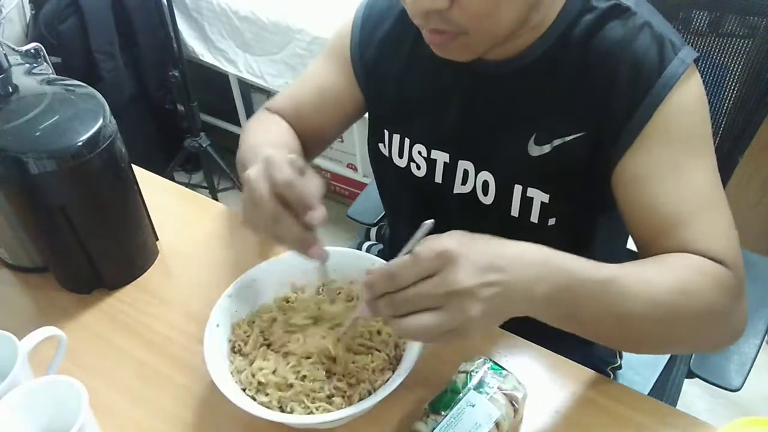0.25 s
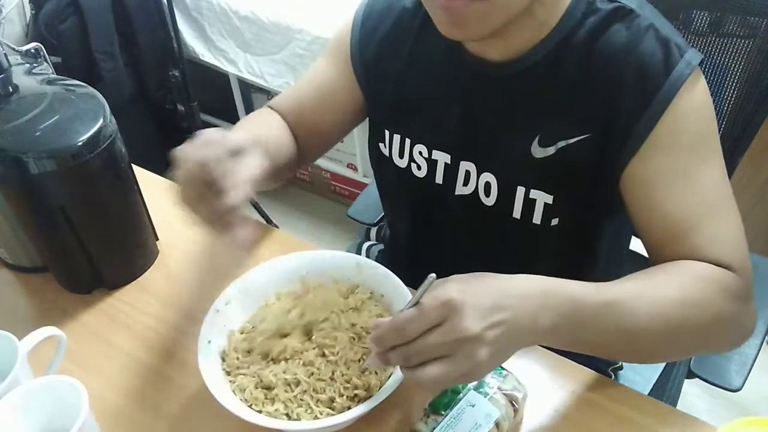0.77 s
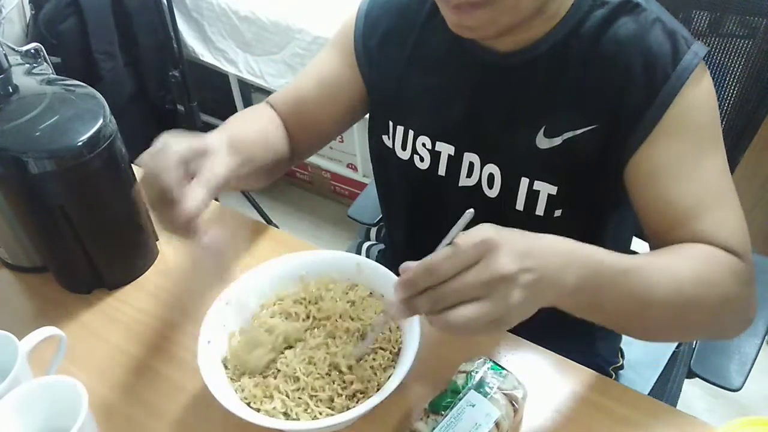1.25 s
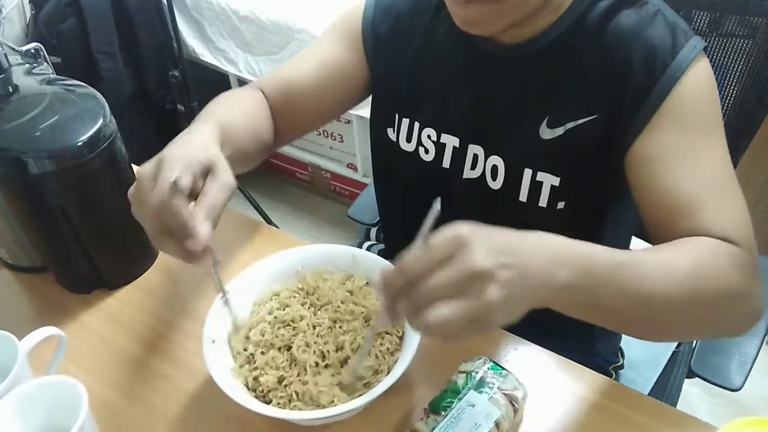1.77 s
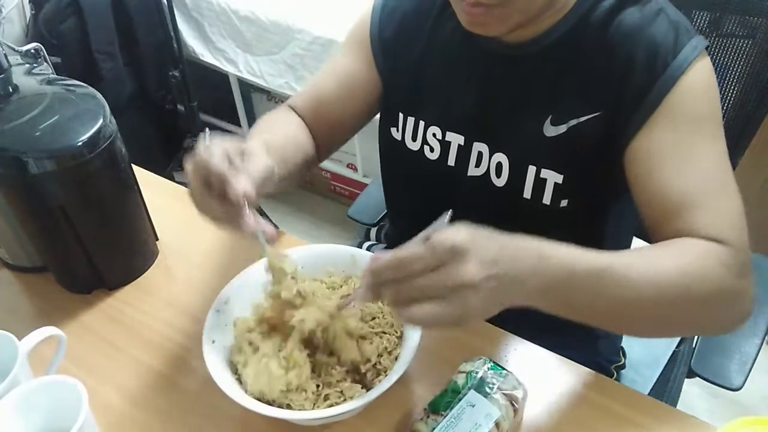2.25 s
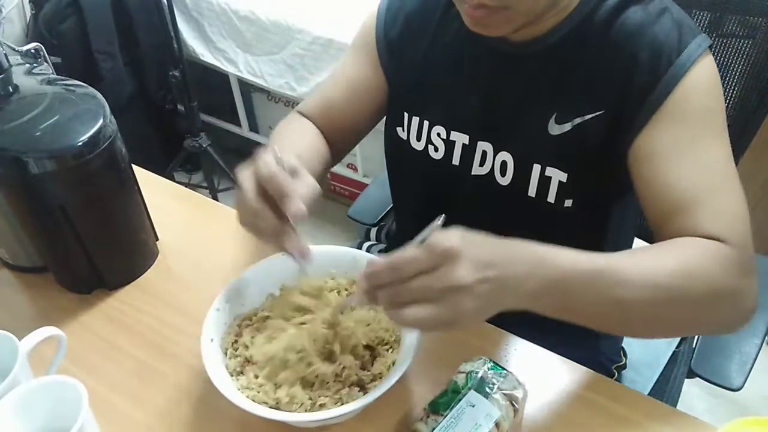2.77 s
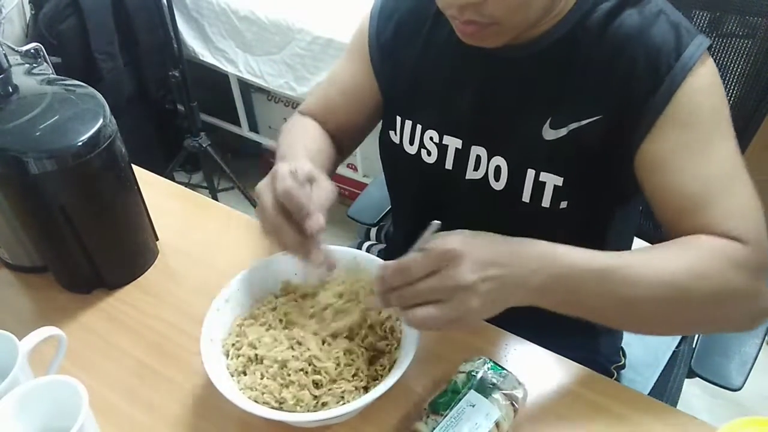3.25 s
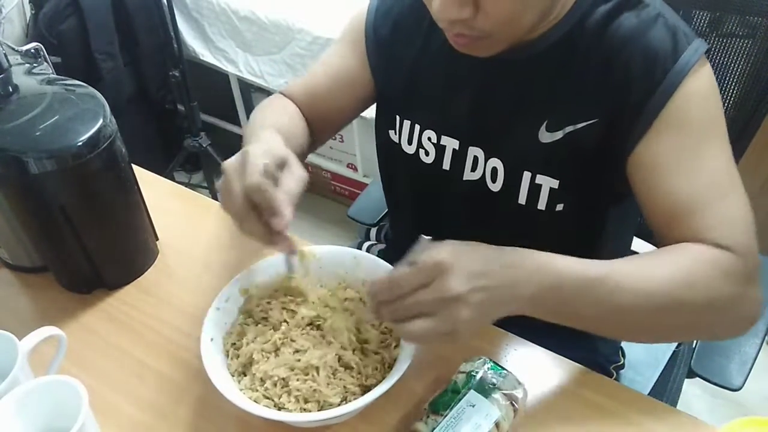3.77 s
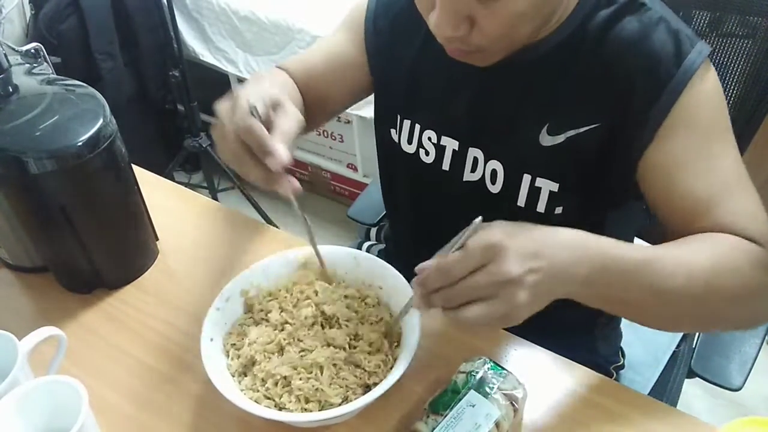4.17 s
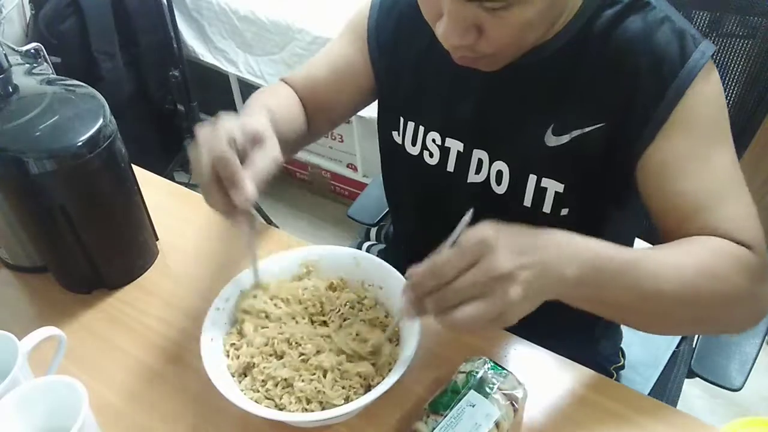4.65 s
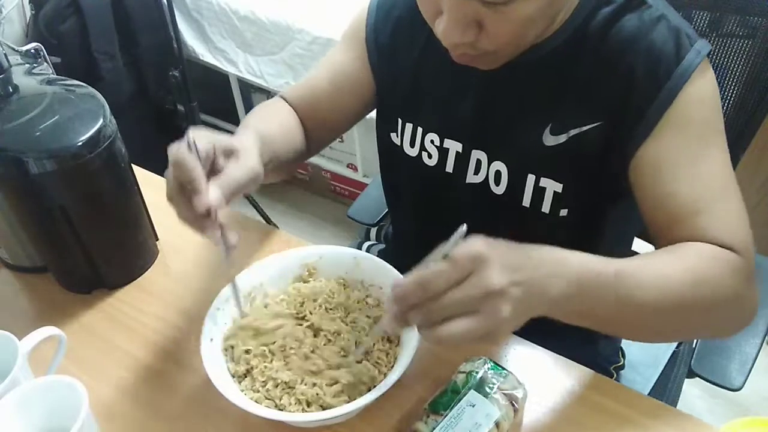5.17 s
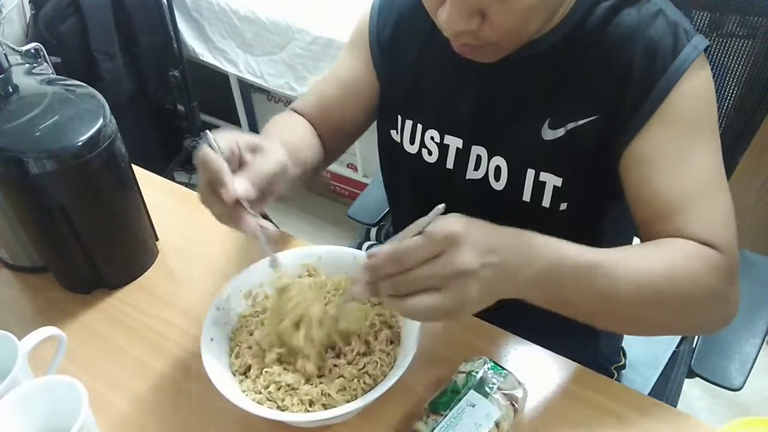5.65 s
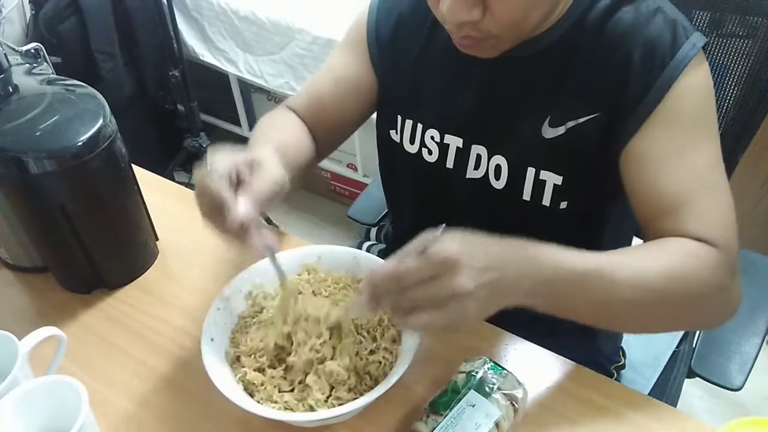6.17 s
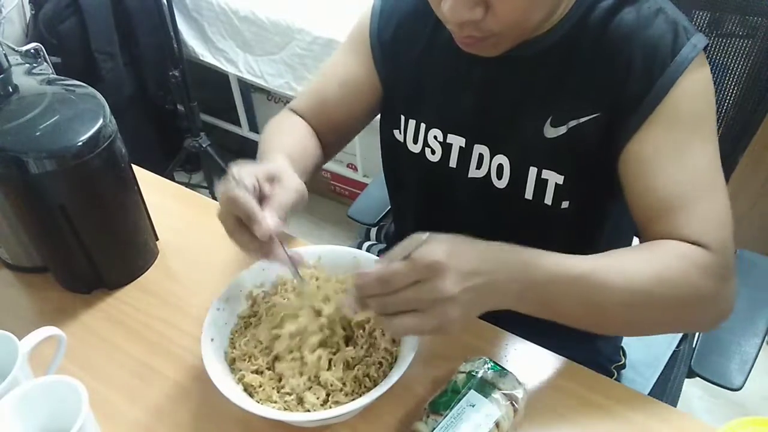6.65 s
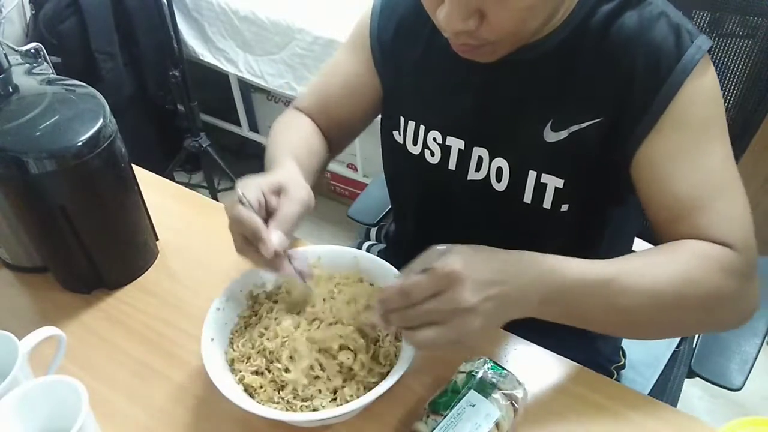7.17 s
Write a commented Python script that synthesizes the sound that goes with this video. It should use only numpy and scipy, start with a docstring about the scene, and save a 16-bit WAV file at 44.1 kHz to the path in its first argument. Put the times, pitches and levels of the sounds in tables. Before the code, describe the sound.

In a small, dry room, metal chopsticks mix noodles in a full ceramic bowl on a wooden table, heard close in stereo. A soft drag opens, then a dull-bright clink falls at 0.56 seconds, a rustle at 0.9, and another clear knock at 1.4. Weaker ticks and a slide come around 1.8 to 2.1, with a brighter swish at 2.26. From 2.55 the pace is regular: firm, often doubled clacks near 2.55, 3.1, 3.7, 4.25, 4.7, 5.3, 5.9, 6.45 and 7.03. Each rings only briefly, damped by the food, with a small wooden thud. Grainy slides and airy tosses fill the gaps, strong near 4.8, 5.0 and 5.9, with a last swish at 7.4. Beneath lie a faint hush, a wavering low hum with short soft bumps, and a barely audible high whine.

```python
"""In a small room, metal chopsticks toss noodles in a full ceramic bowl on a wooden table.
Chattering contacts of the tips excite decaying modes of bowl, sticks and table, with room echoes.
Noodles slide and swish as clumped noise grains, coloured in bands and swelling with each stroke.
Below lie a wavering low hum of a few partials, a hush of filtered noise and a thin whine of sines."""
import sys
import numpy as np
from scipy import signal
from scipy.fft import rfft, irfft, next_fast_len
from scipy.io import wavfile

SR = 44100
rng = np.random.default_rng(int(sys.argv[2]) if len(sys.argv) > 2 else 0)


def master_out(mix):
    """Clip the mix to full scale and print it as 16-bit PCM to the path in sys.argv[1]."""
    frames = np.transpose(np.atleast_2d(mix))
    ceiling = np.clip(frames, -1, 1)
    pcm = np.round(ceiling * 32767).astype(np.int16)
    wavfile.write(sys.argv[1], SR, pcm)


N = 326781   # samples
STEP = 64   # samples between the points of slow level curves


def from_db(db):
    """Logarithmic level: 20 dB are a factor of ten in amplitude."""
    return 10 ** (np.asarray(db) / 20)


def rms_one(x):
    """Normalisation by the root mean square."""
    return x / np.sqrt(np.mean(x ** 2) + 1e-20)


def at_hz(points, hz):
    """Interpolation of a table on a logarithmic frequency axis."""
    table = np.array(points)
    return np.interp(np.log(hz), np.log(table[:, 0]), table[:, 1])


def step_times():
    """Sampling of slow curves: times in seconds, one every STEP samples."""
    return np.arange(0, N + STEP, STEP) / SR


def spread(steps):
    """Linear interpolation of a slow curve to every sample."""
    return np.interp(np.arange(N) / STEP, np.arange(len(steps)), steps)


def drift(rate_hz):
    """Random fluctuation of rms 1: white noise through a two-pole low-pass, at every 40th sample."""
    pole = np.exp(-2 * np.pi * rate_hz * 40 / SR)
    noise = rng.standard_normal(N // 40 + 2002)
    slow = signal.lfilter([1], [1, -2 * pole, pole * pole], noise)[2000:]   # drop the settling
    return np.interp(np.arange(N) / 40, np.arange(len(slow)), rms_one(slow))


def filtered(x, order, cut_hz, kind):
    """Butterworth filtering: a flat pass band with smooth slopes."""
    return signal.sosfilt(signal.butter(order, cut_hz, kind, fs=SR, output="sos"), x)


def shaped(x, gain):
    """Linear filtering as multiplication of the spectrum by a gain over frequency."""
    size = next_fast_len(N + 4096)
    hz = np.maximum(np.arange(size // 2 + 1) * SR / size, 1)
    return irfft(rfft(x, size) * gain(hz), size)[..., :N]


def bands(length):
    """Half-octave analysis of noise: yields each band's centre in Hz and two unrelated signals."""
    edges = 22 * 2 ** np.arange(0, 9.9, .5)
    white = rng.standard_normal((2, 2, length))
    for k, (low, high) in enumerate(zip(edges, edges[1:])):
        # neighbouring bands draw on different noise
        yield np.sqrt(low * high), filtered(white[k % 2], 2, [low, high], "band")


HUSH_DB = -57.5   # rms
# Spectrum of the hush. Each row: frequency in Hz, relative density in dB per Hz.
HUSH_SPECTRUM = [(15, -47.5), (30, -31), (50, -9.5), (80, -1), (105, -1), (200, -14.5), (310, -22.5),
                 (680, -24), (940, -29.5), (3000, -39.5), (9000, -53), (10500, -49), (13000, -63),
                 (16000, -79)]
# Likeness of the channels. Each row: frequency in Hz, left-right correlation (1 is identical).
HUSH_LIKENESS = [(60, 0.94), (180, 0.65), (550, 0.68), (1650, 0.033), (4970, 0.02), (15000, 0.063)]
# Lean of the hush. Each row: frequency in Hz, left over right in dB.
HUSH_LEAN = [(60, -0.5), (180, 0.5), (550, 1.5), (1650, 2.5), (4970, 1.5), (15000, 3.5)]


def hush():
    """Diffuse field: noise that is correlated between channels in the bass and hardly in the treble."""
    out = 0
    for hz, (mid, side) in bands(N):
        alike = at_hz(HUSH_LIKENESS, hz)
        half_lean_db = at_hz(HUSH_LEAN, hz) / 2
        pair = np.sqrt(1 + alike) * mid + np.sqrt(1 - alike) * side * [[1], [-1]]
        level = from_db(at_hz(HUSH_SPECTRUM, hz) + 2.6 * drift(1.8))
        out = out + level * pair * from_db([[half_lean_db], [-half_lean_db]])
    return from_db(HUSH_DB) * rms_one(out)


HUM_DB, HUM_WAVER_DB = -63, 1   # level between swells and its fluctuation
SWELL_RISE_DB_PER_S, SWELL_FALL_DB_PER_S = 420.5, 501
# Brief swells of the hum. Each row: time the top is reached in seconds, top level in dB before the
# waver, pitch in Hz about which it wanders, hold in seconds.
HUM_SWELLS = [(0.0, -41, 100.2, 0.053), (0.145, -46.5, 96.19, .003), (0.292, -55, 100.6, 0.065),
              (0.517, -46.5, 95.84, 0.0023), (0.613, -35, 84.9, 0.0028), (0.824, -50, 84.95, 0.022),
              (1.058, -52.5, 91.67, .003), (1.44, -56, 97, 0.024), (1.982, -65.5, 84, 0.032),
              (2.725, -64, 90.4, 0.024), (3.136, -41.5, 89.8, 0.0084), (4.0, -60.5, 90, 0.0079),
              (4.267, -51.5, 96.55, .005), (4.593, -56, 83.25, .02), (5.055, -38, 97, 0.0037),
              (5.327, -38, 97.54, .005), (5.412, -43, 100.1, 0.0024), (5.628, -47.5, 99.27, .01),
              (5.781, -44.5, 89.8, 0.022), (6.244, -49.5, 92.4, 0.19), (6.507, -42, 91.6, 0.0022),
              (6.58, -53.5, 92.5, 0.023), (6.906, -43.5, 90.15, 0.0037), (7.033, -52.5, 92.7, .03),
              (7.405, -47.5, 83.7, .005)]


def hum():
    """Frequency and amplitude modulation: a low tone wanders in pitch and swells, left ahead in phase."""
    s, top_db, pitch_hz, hold_s = np.transpose(HUM_SWELLS)[:, :, None]
    late = step_times() - s
    below_db = SWELL_RISE_DB_PER_S * np.maximum(-late, 0)
    below_db = below_db + SWELL_FALL_DB_PER_S * np.maximum(late - hold_s, 0)
    swells = spread(from_db(top_db - below_db).sum(axis=0))
    level = swells + from_db(HUM_DB + HUM_WAVER_DB * drift(4.4))
    pitch_hz = np.interp(np.arange(N) / SR, s[:, 0], pitch_hz[:, 0])
    phase = 2 * np.pi * np.cumsum(pitch_hz + 3.4 * drift(11.6)) / SR
    # the tone reaches the two ports a little apart
    phase = phase + (.18 + .1 * drift(3)) * np.array([[1], [-1]])
    tone = np.sin(phase) + 0.055 * np.sin(2 * phase)
    tone = tone + 0.36 * np.sin(1.4 * phase + 5.3 * drift(2.8))   # an inharmonic partial
    return level * from_db(1.7 * drift(26)) * rms_one(tone) * from_db([[-.4], [.4]])


# Tones of the electrical whine. Each row: frequency in Hz, rms level in dB before waver and lean.
WHINE_TONES = [(7877, -80), (11815, -96.5)]


def whine():
    """Pure tones: sines with slight waver of level and phase, stronger on the left."""
    t = np.arange(N) / SR
    tones = 0
    for hz, db in WHINE_TONES:
        level = from_db(db + 1.5 * drift(4)) * np.sqrt(2)   # rms to amplitude
        tones = tones + level * np.sin(2 * np.pi * hz * t + .3 * drift(13))
    return tones * from_db([[3], [-4]])


ROOM_T60_S, TREBLE_T60_S, WALL_CUT_HZ = 0.19, 0.15, 2000   # decay times and where they part


def echoes(count):
    """Reverberation: dense decaying noise per place and channel, faster in the treble, mean energy 1."""
    t = np.arange(SR // 3) / SR
    mid, side = rng.standard_normal((count, 2, 1, len(t))).swapaxes(0, 1)
    side = filtered(side, 1, 250, "high")   # long waves reach both ports alike
    noise = mid + 0.91 * side * [[1], [-1]]
    dull = filtered(noise, 1, WALL_CUT_HZ, "low")
    tail = dull * from_db(-60 * t / ROOM_T60_S) + (noise - dull) * from_db(-60 * t / TREBLE_T60_S)
    lumps = np.repeat(rng.standard_normal((count, 1, len(t) // 100)), 100, axis=2)
    tail = tail * (1 - np.exp(-t / 0.0018)) * from_db(2.0 * lumps)   # echoes come in uneven bunches
    return tail / np.sqrt(np.sum(tail ** 2) / (2 * count))


STROKE_SPAN_DB = 30   # a stroke rises and falls through this range in its rise and fall times
STROKE_ROUNDNESS = 1.25   # above 1 the top of a stroke is rounded
RASP_SAG_OCT_PER_S = 0.84   # the rasp sinks in pitch as a stroke runs out
NOODLE_ECHO_DB = -10


def noodles(strokes, spectrum, grain_db, pivot_hz, rasp_db):
    """Stick-slip friction: dense clumped grains under each stroke, with a tilt and a sinking rasp."""
    s, top_db, brightness_db, rasp_hz, rise_s, fall_s = np.transpose(strokes)[:, :, None]
    late = step_times() - s
    distance = np.maximum(-late / rise_s, late / fall_s)
    levels_db = top_db - STROKE_SPAN_DB * distance ** STROKE_ROUNDNESS
    level = from_db(levels_db).sum(axis=0)
    # the loudest stroke sets the colour
    loudest = levels_db.argmax(axis=0)
    brightness_db = brightness_db[loudest, 0]
    rasp_hz = rasp_hz * 2 ** (-RASP_SAG_OCT_PER_S * np.clip(late, 0, fall_s))
    rasp_hz = rasp_hz[loudest, np.arange(late.shape[1])]

    sizes_db = grain_db * np.minimum(rng.exponential(1, N), 5) + 2.2 * drift(60)
    grains = rng.standard_normal((3, N)) * from_db(sizes_db)
    grains = grains[0] + 1.4 * grains[1:]   # partly alike in the two ports
    grains = rms_one(shaped(grains, lambda hz: from_db(at_hz(spectrum, hz))))

    dry = 0
    edges = 500 * 2 ** np.arange(0, 5.1, .5)
    for low, high in zip(edges, edges[1:]):
        hz = np.sqrt(low * high)
        tilt_db = brightness_db * np.tanh(np.log2(hz / pivot_hz) / .5)
        peak_db = rasp_db * np.exp(-(np.log2(hz / rasp_hz) / 0.23) ** 2)
        band = filtered(grains, 2, [low, high], "band")
        flicker = from_db(1.6 * drift(30) - 3)
        # neighbouring bands alternate in sign
        dry = -dry + spread(level * from_db(tilt_db + peak_db)) * flicker * band
    echo = signal.fftconvolve(dry, echoes(count=1)[0], axes=1)[:, :N]
    return dry + from_db(NOODLE_ECHO_DB) * echo


# Noodles dragged along the bowl. Each row: time of the top in seconds, top level in dB before colouring,
# brightness tilt in dB, starting centre of the rasp in Hz, rise in seconds, fall in seconds.
SLIDE_STROKES = [(0.0, -55, -5, 2080, .02, 0.12), (0.115, -71.5, 0.5, 1800, 0.058, 0.12),
                 (0.53, -57.5, -3.5, 3100, 0.16, 0.11), (0.62, -60, 4, 2600, 0.04, 0.14),
                 (0.754, -75.5, -4, 1640, .1, 0.11), (0.934, -47.5, -2.5, 3570, 0.034, 0.13),
                 (1.388, -58.5, 0, 4300, .05, 0.24), (1.558, -67, -2, 2950, 0.29, 0.052),
                 (1.63, -72, -7.5, 1780, 0.15, 0.052), (1.84, -65.5, 12, 3350, 0.061, 0.12),
                 (1.94, -50.5, -6, 2670, 0.028, 0.133), (2.07, -61, -6.5, 2360, 0.16, 0.13),
                 (2.63, -53, 5.5, 2890, 0.024, 0.043), (2.68, -64, 6.5, 3600, 0.016, 0.15),
                 (3.21, -50.5, 0, 2450, 0.025, 0.1), (4.32, -54, 1, 3240, 0.14, .05),
                 (4.78, -42.5, -4, 2200, 0.03, 0.082), (5.34, -56.5, -6, 2800, .03, 0.12),
                 (5.4, -50, -5, 2500, 0.12, 0.11), (5.926, -47, 1, 4100, 0.019, .02),
                 (5.985, -50.5, -1, 3280, 0.1, 0.084), (6.55, -61.5, 2, 1450, 0.044, 0.1),
                 (7.128, -60.5, -4, 2550, .1, 0.25), (7.194, -49, -3, 1800, 0.0092, 0.043)]
# Spectrum of the sliding grains. Each row: frequency in Hz, relative density in dB per Hz.
SLIDE_SPECTRUM = [(470, -31.5), (800, -25), (1300, -6.5), (1640, -12.5), (3910, -6.5), (6000, -10),
                  (8130, -6.5), (9920, -34), (14200, -36.5), (15500, -65.5)]


def slides():
    """Sliding friction: grains with a raised rasp band."""
    return noodles(SLIDE_STROKES, SLIDE_SPECTRUM, grain_db=1.5, pivot_hz=3200, rasp_db=7.5)


SWISH_FALL_S = 0.079
# Strands tossed up. Each row: time of the top in seconds, top level in dB before colouring,
# brightness tilt in dB, starting centre of the rasp band in Hz, rise in seconds.
SWISH_STROKES = [(2.259, -47.5, 4.5, 5700, 0.046), (2.826, -46, 6.5, 6900, 0.044),
                 (3.42, -51.5, 11, 8100, 0.066), (4.463, -48, 8, 8000, 0.03),
                 (5.004, -43.5, 5.5, 5550, 0.075), (5.629, -53.5, 8, 7700, 0.048),
                 (6.73, -64, 6.5, 7460, .07), (7.41, -44.5, 6, 6340, 0.042)]
# Spectrum of the swishing grains. Each row: frequency in Hz, relative density in dB per Hz.
SWISH_SPECTRUM = [(1060, -38), (2300, -5), (3690, 0.5), (4430, -2), (4760, 3), (8670, -1.5), (10100, -22),
                  (13800, -18), (14700, -40), (15100, -77), (15800, -63)]


def swishes():
    """Broadband friction: rougher grains, with the rasp band as a shallow dip."""
    tosses = [tuple(row) + (SWISH_FALL_S,) for row in SWISH_STROKES]
    return noodles(tosses, SWISH_SPECTRUM, grain_db=4.0, pivot_hz=8000, rasp_db=-3.0)


CHATTER_S, CRACK_SHARE = 0.001, 0.63   # a contact is a brief chatter; part of it is heard without ring
SPOT_DB, SPOT_WIDTH_OCT = 17.5, 0.42   # modes near the favoured pitch ring up to this much louder


def strike(modes, peak_db, spread_db, spot_hz):
    """Modal excitation: a chattering contact cracks and sets decaying modes ringing; one row a knock."""
    t = np.arange(SR // 8) / SR
    hz, level_db, t60 = np.transpose(modes)[:, :, None]
    # each knock finds every mode a little different in strength and pitch
    luck = rng.standard_normal((len(peak_db), 2, len(modes), 1))
    rings = np.sin(2 * np.pi * hz * (1 + 0.022 * luck[:, 1]) * t) * from_db(level_db - 60 * t / t60)
    favour_db = SPOT_DB * np.exp(-(np.log2(hz / spot_hz[:, None, None]) / SPOT_WIDTH_OCT) ** 2)
    rings = np.sum(from_db(spread_db * luck[:, 0] + favour_db) * rings, axis=1)

    contact = rng.standard_normal(rings.shape) * t / CHATTER_S * np.exp(-t / CHATTER_S)
    contact[:, round(CHATTER_S * SR)] += 2.2   # the main touch stands out of the chatter
    contact = filtered(contact, 3, 0.69 * hz.min(), "high")
    ringing = signal.fftconvolve(contact, rings, axes=1)[:, :len(t)]
    crack = filtered(contact, 2, [0.91 * hz.min(), min(0.94 * hz.max(), 11000)], "band")

    ringing = ringing / np.linalg.norm(ringing, axis=1, keepdims=True)
    crack = crack / np.linalg.norm(crack, axis=1, keepdims=True)
    size = np.sqrt(SR * np.mean(t60) / 30)   # a longer ring holds more energy
    return (ringing + CRACK_SHARE * crack) * size * from_db(peak_db)[:, None]


# levels relative to the knock; the shares say how far a part follows the weight or the sharpness
THUD_DB, LOW_RING_DB, THUD_FOLLOWS = -1.5, -1, 0.36   # grow with the weight, the thud by this share
STICK_DB, UPPER_RING_DB, UPPER_FOLLOWS = -5, 6.5, 0.49   # grow with sharpness, the bowl by this share
# Modes of the bowl, damped by the noodles. Each row: nominal frequency in Hz, relative level in dB,
# 60 dB decay time in seconds.
BOWL_MODES = [(1050, -2, .014), (1300, 0, .014), (1550, -5, .01), (2050, -5, .012), (2390, 0, .028),
              (2540, 0, .028), (2900, -4, .01), (3180, -3, .012), (3610, 0, .014), (4050, 0, .014),
              (4400, -3, .008), (4800, -1, .01), (5300, -6, .007)]
# Modes of the steel sticks. Each row: nominal frequency in Hz, relative level in dB, decay in seconds.
STICK_MODES = [(6101, -5, 0.004), (6250, 21.5, 0.014), (6800, 11.5, 0.004), (8000, -18, 0.0027),
               (8750, -13.5, 0.0038), (8450, -22.5, 0.008), (8800, -30.5, 0.008), (11260, -52, 0.0018),
               (11700, -57, 0.0017), (13800, -30.5, 0.0026)]
# Modes of the table top. Each row: nominal frequency in Hz, relative level in dB, decay in seconds.
TABLE_MODES = [(266, -3, .11), (320, -7, .06), (369, 0, .1), (430, -5, .06), (494, -2, .09), (550, -3, .09),
               (600, -6, .06), (660, -3, .08), (770, -6, .06), (868, -5, .06)]
# Sticks on the bowl. Each row: time in seconds, relative level in dB, weight of the blow in dB,
# sharpness of the tip in dB, left-right lean in dB before a common offset, echo level in dB re the blow,
# pitch that the struck spot favours in Hz.
STICK_KNOCKS = [(0.5628, -28.5, 12, 12, 8, -1.8, 3570), (0.907, -41, 8.5, 9, 5, 2, 4470),
                (1.3451, -44, -30, 27, 11, -3, 5000), (1.4295, -22.5, 1.5, 2, 8, -1.6, 3700),
                (1.7928, -33, -30, 21, 9.5, -2.5, 3100), (1.9335, -29.5, -25.5, -17, 1.5, -8, 2800),
                (2.0802, -39.5, -36, -31, 6, -12, 2800), (2.4895, -73.5, -4, 21, -4.5, -9, 5240),
                (2.551, -20.5, 2, -1, 7.5, 4, 3130), (2.561, -14, -1.6, 1, 4, -5, 3720),
                (2.6745, -48.5, 4, 14, 12, -12, 5400), (3.1035, -28.5, 3, 11.5, 10, -1.5, 4480),
                (3.138, -16, -0.3, -3.5, 7.5, -1, 4060), (3.7231, -25, 2, -1.5, 4, 7.5, 4050),
                (3.7386, -20, 4.5, -3.5, 11, -0.2, 2830), (4.1526, -46.5, -14.5, 29.5, 7.5, 3, 4320),
                (4.2528, -19.5, 3, -1.5, 7.5, -3, 4630), (4.3249, -44, -5, 14.5, 8, -3.5, 2920),
                (4.6729, -49.5, 8, 23.5, 7.5, 7.5, 3020), (4.7093, -14, -4.5, -9.5, 6.5, -1.5, 3650),
                (4.8348, -48, 0, 19.5, 7, -3, 3720), (5.2653, -32.5, 7.5, 5, 7.5, 5.5, 4030),
                (5.2899, -20, 3, 2.5, 7, -2.5, 3760), (5.8754, -52, 6.5, 33.5, 6, -0.5, 4030),
                (5.9188, -47, -19, 21.5, 7, -3, 3980), (6.4369, -15.5, -10, -6.5, 7, 0.5, 4500),
                (6.4624, -16, 5, -3.5, 8, -3.5, 3900), (6.5614, -50.5, 22, 19.5, 8, -16, 3520),
                (7.0245, -15.5, -5, -4, 6, -1.7, 4500), (7.0419, -21, 1.5, 3.5, 5.5, -3.5, 4040),
                (7.1956, -54, 19, 31.5, 11, -8, 3430)]


def knocks():
    """Coupled vibration: bowl, sticks and table ring from each blow, and each spot has its own echoes."""
    s, peak_db, weight_db, tip_db, lean_db, echo_db, spot_hz = np.transpose(STICK_KNOCKS)
    low, middle, upper = np.split(BOWL_MODES, [3, 6])
    upper_db = peak_db + UPPER_RING_DB + UPPER_FOLLOWS * tip_db
    # neighbouring groups of modes alternate in sign
    blows = strike(low, peak_db + LOW_RING_DB + weight_db, spread_db=2.0, spot_hz=spot_hz)
    blows = blows - strike(middle, peak_db, spread_db=6.5, spot_hz=spot_hz)
    blows = blows + strike(upper, upper_db, spread_db=1.0, spot_hz=spot_hz)
    blows = blows - strike(STICK_MODES, peak_db + STICK_DB + tip_db, spread_db=7.5, spot_hz=spot_hz)

    t = np.arange(blows.shape[1]) / SR
    thud_db = peak_db + THUD_DB + THUD_FOLLOWS * weight_db
    thud = strike(TABLE_MODES, thud_db, spread_db=0.0, spot_hz=spot_hz)
    # the heavy table top takes some milliseconds to swing up
    thud = thud * (1 - np.exp(-t / 0.0068)) * np.cos(np.pi * t / t[-1] / 2)

    heard = signal.fftconvolve((blows + 1.3 * thud)[:, None], echoes(count=len(s)), axes=2)
    heard = heard * from_db(echo_db)[:, None, None]
    heard[:, :, :len(t)] += (blows + thud)[:, None]
    length = heard.shape[2]
    out = np.zeros((2, N + length))
    starts = ((s - CHATTER_S) * SR).astype(int)   # the main touch falls on the stated time
    for at, blow, lean in zip(starts, heard, lean_db - 7.0):
        out[:, at:at + length] += blow * from_db([[lean / 2 - 6.5], [-lean / 2 - 6.5]])
    return filtered(out[:, :N], 2, 190, "high")


# Colour of the two ports. Each row: frequency in Hz, left over right in dB.
PORT_LEAN = [(100, 0), (300, 4), (1000, 2), (2400, 3), (5000, 5.5), (8000, 9), (13000, 12)]
# Phase between the ports. Each row: frequency in Hz, lead of the left in radians.
PORT_LEAD = [(100, .2), (300, 0.12), (1000, 0.38), (2400, 1.9), (5000, 0.43), (13000, 4.2)]


def ports(x):
    """Interchannel differences: the two microphone ports hear with their own colour and phase."""
    side = np.array([[.5], [-.5]])

    def gain(hz):
        """Complex transfer function of each port."""
        return from_db(side * at_hz(PORT_LEAN, hz)) * np.exp(1j * side * at_hz(PORT_LEAD, hz))

    return shaped(x, gain)


def scene():
    """Superposition: bowl and noodles at the ports, over the steady background."""
    background = hush() + hum() + whine()
    return background + ports(slides() + swishes() + knocks())


def record(dry):
    """Band limiting: the microphone fades above 14 kHz and a steep filter cuts the top."""
    faded = filtered(dry, 4, 14600, "low")
    return signal.sosfilt(signal.cheby2(12, 70, 16400, fs=SR, output="sos"), faded)


dry = scene()
out = record(dry)
master_out(out)
```